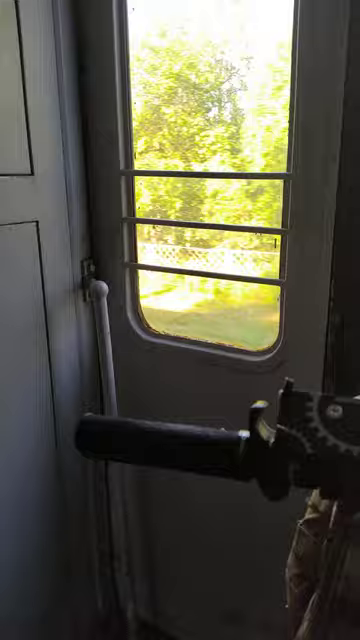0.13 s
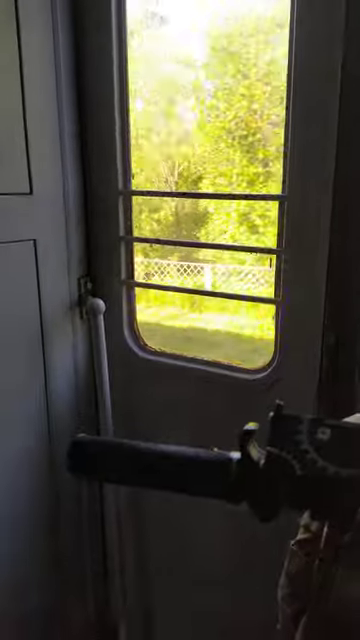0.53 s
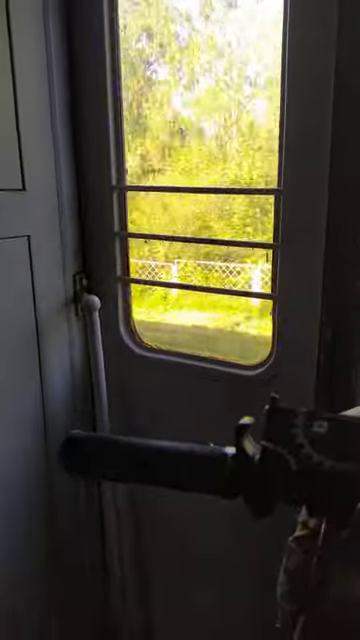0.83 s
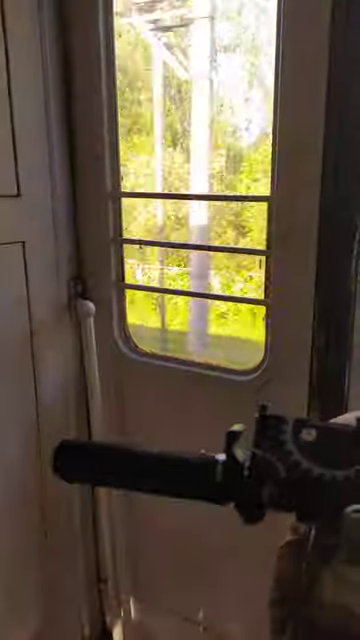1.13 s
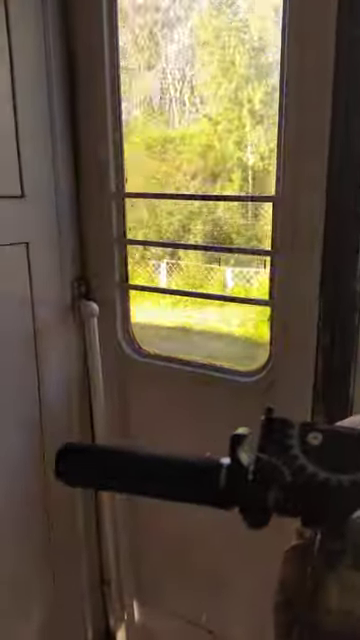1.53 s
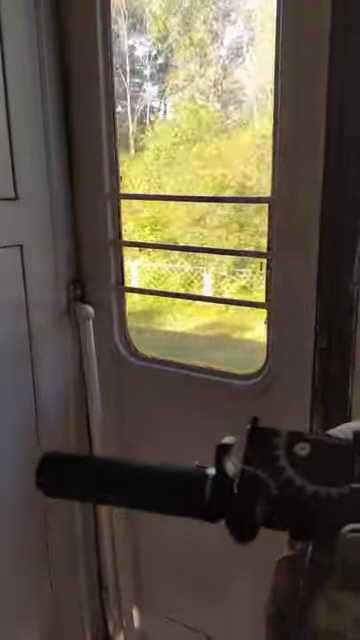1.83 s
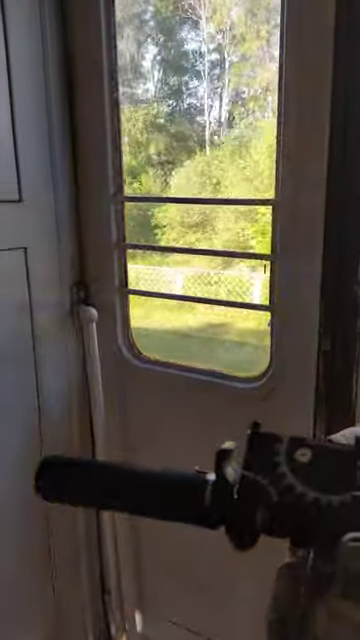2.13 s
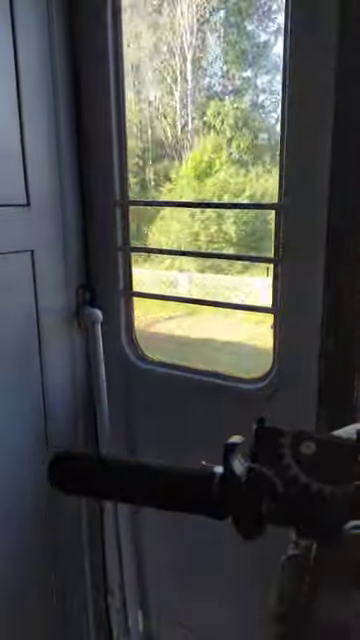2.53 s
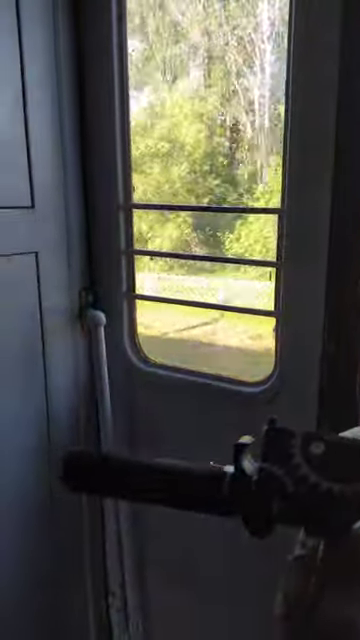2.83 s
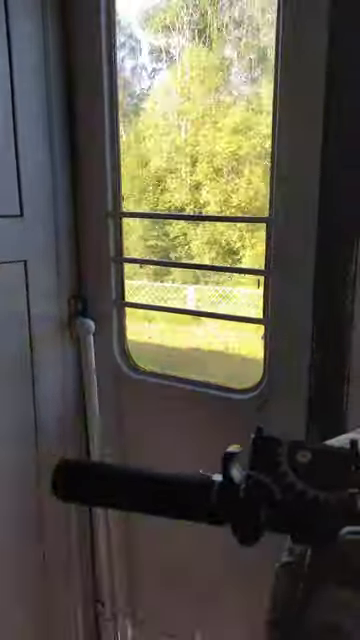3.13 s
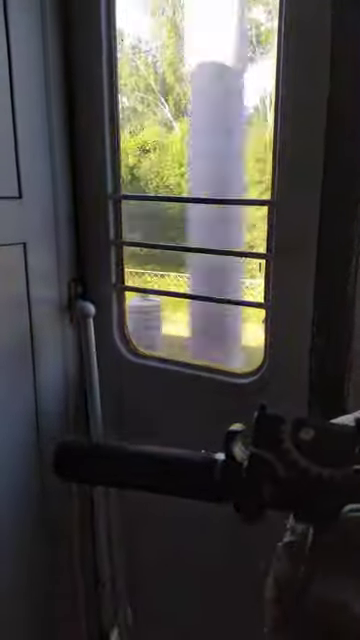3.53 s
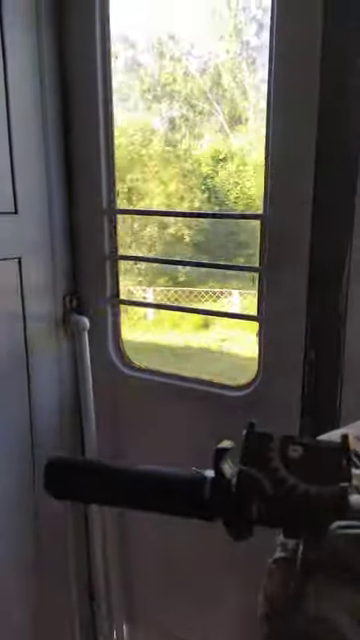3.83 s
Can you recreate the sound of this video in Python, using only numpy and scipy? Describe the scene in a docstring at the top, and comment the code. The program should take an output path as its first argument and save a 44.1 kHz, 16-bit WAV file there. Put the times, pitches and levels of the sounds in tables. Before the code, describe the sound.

Moving train rumbles and roars inside a small steel vestibule, with humming wheels and dull jolts.

```python
"""Inside the vestibule of a moving train; the sound cuts in after a moment of silence.
The floor rumbles, and rolling noise booms in the small steel room and roars through its walls: shaped noise.
The wheels hum in swells, about seven a second, beside a thin gear whine: tones of wandering pitch.
Air rushes through the door gaps and rings the door panel: shaped and resonant noise.
Uneven spots of track send dull jolts through the coach: short bursts of thudding and clattering noise."""
import sys
import numpy as np
from scipy.fft import rfft, irfft, next_fast_len
from scipy.io import wavfile
from scipy.ndimage import map_coordinates

SR = 44100
rng = np.random.default_rng(int(sys.argv[2]) if len(sys.argv) > 2 else 0)


def dump(signal):
    """Clip the signal to [-1, 1] and save it as 16-bit WAV at the path in sys.argv[1]."""
    limited = np.clip(np.atleast_2d(signal).T, -1, 1)
    pcm = np.round(limited * 32767).astype(np.int16)
    wavfile.write(sys.argv[1], SR, pcm)


N = 176400
TIME = np.arange(N) / SR  # s

# Courses of the floor rumble, the boom, the rolling roar and the air, each before its trim: time_s, level_db
RUMBLE_COURSE = [(0.38, -33), (2.01, -27.5), (2.6, -36.5), (2.63, -31.5), (3.92, -30.5), (4.0, -30)]
BOOM_COURSE = [(0.38, -18.5), (0.69, -22.5), (0.71, -19), (1.25, -19.5), (1.62, -16), (1.74, -20),
               (1.89, -15), (2.16, -20.5), (2.46, -17.5), (3.97, -18), (4.0, -20)]
ROAR_COURSE = [(0.38, -28), (0.72, -33), (0.73, -29.5), (0.9, -29), (0.91, -27), (1.28, -30.5), (1.47, -29),
               (1.79, -32), (1.8, -28.5), (2.22, -29.5), (3.96, -28), (4.0, -28)]
AIR_COURSE = [(0.38, -30), (1.82, -29.5), (2.67, -30), (2.79, -28), (3.0, -29.5), (3.51, -30), (3.53, -29),
              (3.99, -29.5), (4.0, -30)]
RUMBLE_TRIM_DB, BOOM_TRIM_DB, ROAR_TRIM_DB, AIR_TRIM_DB = 2, 0, 5.5, 3
# Relative spectra of the floor, the rolling noise and the door gaps: frequency_hz, density_db (per Hz)
FLOOR_SPECTRUM = [(4, -14), (16, -4.5), (32, -4.5), (48, -2.5), (64, 0.5), (85, -8), (115, -13.5),
                  (170, -27), (400, -80), (1000, -120)]
ROLLING_SPECTRUM = [(30, -70), (90, -20), (160, -7.5), (300, -2), (550, 0), (640, -2), (705, 1), (790, -4),
                    (870, -2), (980, -2), (1100, -11.5), (1300, -16.5), (2000, -29), (5000, -70),
                    (12000, -120)]
GAP_SPECTRUM = [(60, -60), (400, -9.5), (1200, -3), (1450, -3), (1780, -2.5), (2050, 1), (2220, -.5),
                (2400, 1.5), (2950, -2.5), (3250, -5.5), (4000, -7), (5000, -10.5), (7000, -12.5),
                (9000, -10.5), (10500, -16), (11500, -26.5), (13000, -48)]
# Resonances of the vestibule: centre_hz, width_hz, relative_level_db
VESTIBULE_MODES = [(168.4, 9.9, 0.5), (184.7, 11, -6), (211, 11, 1), (231.6, 18, -5), (258, 21, -4),
                   (298, 8.1, -12), (346, 23, -2), (375, 12.6, -4.5), (447.5, 8.4, -5), (503, 54, -6.5)]
# Spacing and depth of the dense upper room modes, and the frequency where they blur
RIPPLE_HZ, RIPPLE_DB, RIPPLE_TOP_HZ = 14, 2, 3000
# Swells of the wheel hum, about one for each turn: peak_s, level_db
HUM_SWELLS = [(.375, -21.5), (.44, -23), (.57, -23), (0.831, -21.5), (.96, -21), (1.115, -18.5),
              (1.242, -19.5), (1.43, -24.5), (1.538, -17.5), (1.67, -24), (1.84, -18.5), (1.94, -19.5),
              (2.148, -20), (2.275, -20), (2.425, -17), (2.735, -16), (2.835, -23), (2.965, -16),
              (3.154, -21), (3.272, -21), (3.416, -21), (3.527, -16), (3.635, -20), (3.852, -17.5),
              (3.98, -16.5)]
# Pitch of the hum and scale of its wander
HUM_HZ, HUM_DRIFT_HZ = 526.3, 3.98
# Scale of its unsteadiness, level between swells, time from a swell's peak to 1/e of its power
HUM_WAVER_DB, HUM_FLOOR_DB, SWELL_S = 1, -34.5, 0.027
# Fundamental and octave of the gear whine: level_db, left_right_phase_rad
WHINE_PARTIALS = [(-30, 1.45), (-43.5, 1.67)]
WHINE_HZ = 575.7
# Ringing of the door panel: centre_hz, width_hz, relative_level_db (before the response is squared)
DOOR_MODES = [(1565, 58, -1), (1645, 85, 0.5), (2380, 67, -4)]
DOOR_DB = -36
# Jolts from the track: start_s, thud_db, clatter_db
TRACK_JOLTS = [(.712, -16, -30), (.91, -21, -21), (1.412, -24, -20), (1.565, -19, -24.5),
               (1.88, -18.5, -24), (2.46, -15, -29), (2.78, -22.5, -28), (3.06, -20, -34),
               (3.385, -20.5, -34), (3.68, -22, -21.5)]
JOLT_ATTACK_S, JOLT_DECAY_S = 0.017, 0.068  # time constants
# Relative spectra of the thud and the clatter: frequency_hz, density_db (per Hz)
THUD_SPECTRUM = [(30, -70), (100, -28), (160, -5.5), (210, 5), (260, -7.5), (400, -13), (900, -40),
                 (6000, -120)]
CLATTER_SPECTRUM = [(50, -70), (200, -13), (380, -1), (700, 4.5), (950, -1.5), (1400, -11), (3000, -21),
                    (7000, -34), (13000, -90)]
# Likeness of the left and right noise: frequency_hz, correlation (-1 to 1)
LIKENESS = [(30, .995), (60, 0.99), (100, 0.99), (160, 0.98), (250, 0.87), (400, .75), (550, 0.55),
            (700, 0.44), (900, -0.091), (1150, -0.1), (1800, -0.0058), (10000, -0.008)]
# Balance of the two microphones: frequency_hz, left_over_right_db
BALANCE = [(25, -.3), (60, -2.5), (100, 3.5), (170, 0.4), (300, 0.5), (520, 0.8), (690, 1.9), (1100, -1.4),
           (2000, 1.7), (4000, 1), (8000, -1), (10000, 1.5), (12000, 16.5)]
# Onset of the sound and length of its fade; limit of the rounded peaks; band limit
START_S, FADE_S, CEILING, TOP_HZ = 0.3499, 0.01, 0.8, 13450


def amp(db):
    """Level to gain: twenty decibels are a factor of ten in amplitude."""
    return 10 ** (np.asarray(db) / 20)


def unit(x):
    """Normalisation: a signal divided by its root mean square has rms 1."""
    return x / np.sqrt(np.mean(x ** 2) + 1e-20)


def along(points, hz):
    """Interpolation on a logarithmic frequency axis, so that equal ratios take equal steps."""
    f, v = np.transpose(points)
    return np.interp(np.log(hz + 1), np.log(f + 1), v)


def curve(rows):
    """Linear interpolation in time: rows of time and value become one value per sample."""
    return np.interp(TIME, *np.transpose(rows))


def wobble(rate):
    """Slow random modulation: a smooth curve through random knots, rate of them a second."""
    knots = rng.standard_normal(int(N * rate / SR) + 4)
    return map_coordinates(knots, [TIME * rate])


def filtered(x, response):
    """Linear filtering: the spectrum is multiplied by a response of frequency."""
    size = next_fast_len(N + SR // 2)
    spectrum = rfft(x, size) * response(np.fft.rfftfreq(size, 1 / SR))
    return irfft(spectrum, size)[..., :N]


def colour(points):
    """Spectral shaping: the response that follows a curve of frequency and decibels."""
    return lambda hz: amp(along(points, hz))


def resonant(modes):
    """Resonance: damped oscillators pass a band round their centres and add in power."""
    def response(hz):
        power = 0
        for centre, width, db in modes:
            damping = (hz * width) ** 2
            power = power + amp(db) ** 2 * damping / ((centre ** 2 - hz ** 2) ** 2 + damping)
        return np.sqrt(power)
    return response


def rush(response):
    """Diffuse field: stereo noise of rms 1, alike in the bass and nearly independent in the treble."""
    def mid_side(hz):
        # mid and side shares cos and sin give a left-right correlation of cos(2 * angle)
        angle = np.arccos(np.clip(along(LIKENESS, hz), -1, 1)) / 2
        return response(hz) * np.array([np.cos(angle), np.sin(angle)])

    mid, side = filtered(rng.standard_normal((2, N)), mid_side)
    return unit(np.array([mid + side, mid - side]))


def tone(hz, drift_hz, spread):
    """Frequency modulation: a stereo sine of rms 1 with wandering pitch, its sides spread rad apart."""
    phase = 2 * np.pi * np.cumsum(hz + drift_hz * wobble(21.96)) / SR
    return unit(np.sin([phase + spread / 2, phase - spread / 2]))


def room_ripple(hz):
    """Modal density: the dense modes of the steel room lift some frequencies and sink others."""
    knots = rng.standard_normal(8192)
    depth_db = RIPPLE_DB / (1 + (hz / RIPPLE_TOP_HZ) ** 2)
    return amp(depth_db * map_coordinates(knots, [hz / RIPPLE_HZ], mode="mirror"))


def coach(low_hz=150, high_hz=620):
    """Structure-borne sound: rolling shakes the floor, excites the room modes and roars through the walls."""
    def boom_response(hz):
        band_edges = (1 + (low_hz / (hz + 1)) ** 12) * (1 + (hz / high_hz) ** 12)
        return resonant(VESTIBULE_MODES)(hz) / np.sqrt(band_edges)

    def roar_response(hz):
        return colour(ROLLING_SPECTRUM)(hz) * room_ripple(hz)

    rumble = amp(curve(RUMBLE_COURSE) + RUMBLE_TRIM_DB) * rush(colour(FLOOR_SPECTRUM))
    boom = amp(curve(BOOM_COURSE) + BOOM_TRIM_DB) * rush(boom_response)
    roar_db = curve(ROAR_COURSE) + ROAR_TRIM_DB + 0.49 * wobble(14)
    roar = amp(roar_db) * rush(roar_response)
    return rumble + boom + roar


def wheels():
    """Amplitude modulation: a hum swells unevenly as the wheels turn, beside a thin, nearly steady gear whine."""
    power = amp(HUM_FLOOR_DB) ** 2
    for peak_s, db in HUM_SWELLS:
        power = power + amp(db) ** 2 * np.exp(-((TIME - peak_s) / SWELL_S) ** 2)
    waver = amp(HUM_WAVER_DB * wobble(40))
    hum = np.sqrt(power) * waver * tone(HUM_HZ, HUM_DRIFT_HZ, spread=0.32)

    whine = np.zeros((2, N))
    for harmonic, (db, spread) in enumerate(WHINE_PARTIALS, start=1):
        level = amp(db + 1.6 * wobble(12))
        whine += level * tone(harmonic * WHINE_HZ, drift_hz=2.1, spread=spread)
    return hum + whine


def air():
    """Transmission through apertures: outside noise rushes through the door gaps and rings the door panel."""
    def gap_response(hz):
        return colour(GAP_SPECTRUM)(hz) * room_ripple(hz)

    flutter_db = 0.42 * wobble(16)
    hiss = amp(curve(AIR_COURSE) + AIR_TRIM_DB + flutter_db) * rush(gap_response)
    # squaring the response narrows the resonances
    panel = amp(DOOR_DB + 0.67 * wobble(7.3)) * rush(lambda hz: resonant(DOOR_MODES)(hz) ** 2)
    return hiss + panel


def jolts():
    """Impulsive excitation: each rough spot of track gives a dull thud and a blurred clatter that decay."""
    thud, clatter = np.zeros(N), np.zeros(N)
    for start_s, thud_db, clatter_db in TRACK_JOLTS:
        age = np.maximum(TIME - start_s, 0)
        shape = (1 - np.exp(-age / JOLT_ATTACK_S)) * np.exp(-age / JOLT_DECAY_S)
        shape /= shape.max()
        thud += amp(thud_db) * shape
        clatter += amp(clatter_db) * shape
    return thud * rush(colour(THUD_SPECTRUM)) + clatter * rush(colour(CLATTER_SPECTRUM))


def scene():
    """Superposition: the pressures of all sources heard beside the door add."""
    return coach() + wheels() + air() + jolts()


def record(dry):
    """Transduction: two slightly unequal microphones, cut in abruptly, with rounded peaks and a band limit."""
    def microphones(hz):
        half_db = along(BALANCE, hz) / 2
        return amp(np.array([half_db, -half_db]))

    pair = filtered(dry, microphones)
    rounded = pair / (1 + (pair / CEILING) ** 6) ** (1 / 6)
    onset = np.clip((TIME - START_S) / FADE_S, 0, 1)
    return filtered(rounded * onset, lambda hz: hz < TOP_HZ)


dry = scene()
out = record(dry)
dump(out)
```